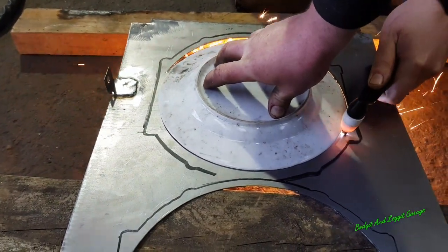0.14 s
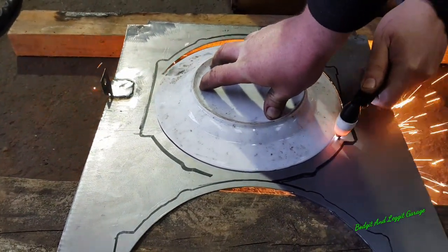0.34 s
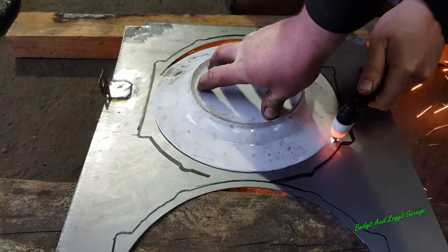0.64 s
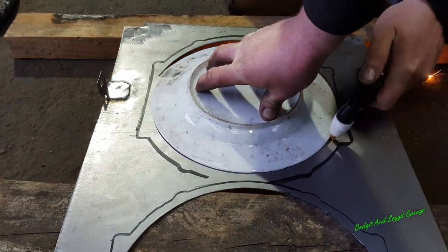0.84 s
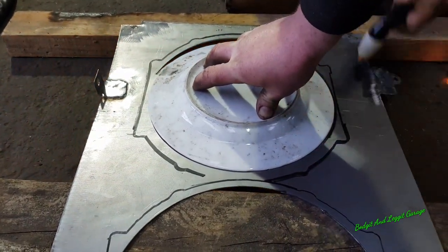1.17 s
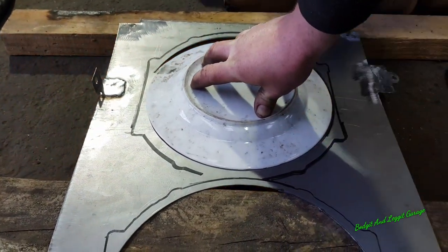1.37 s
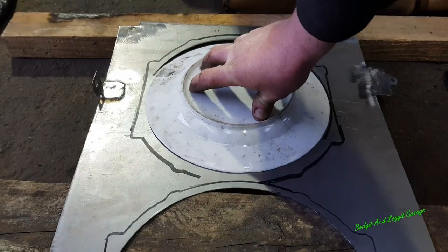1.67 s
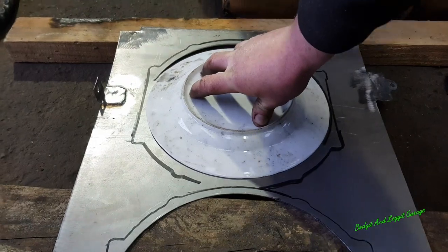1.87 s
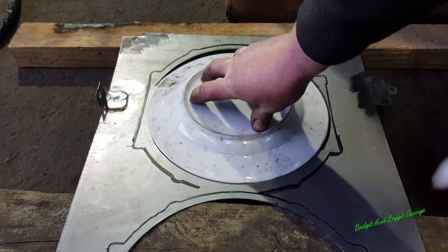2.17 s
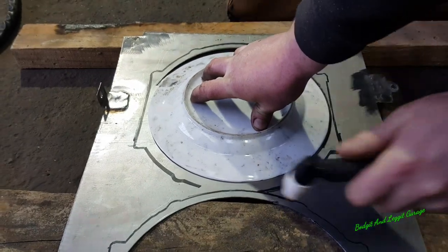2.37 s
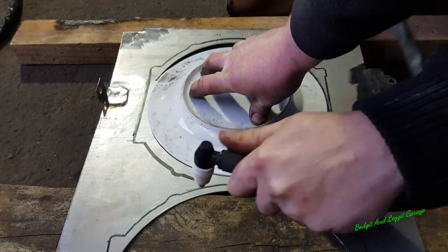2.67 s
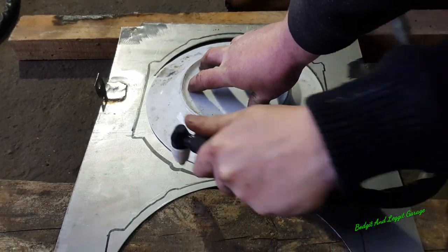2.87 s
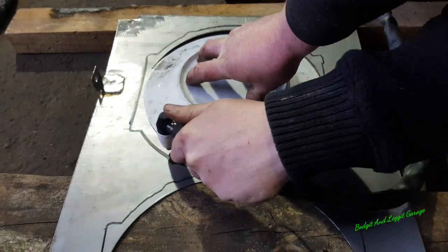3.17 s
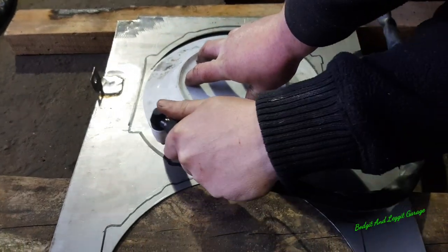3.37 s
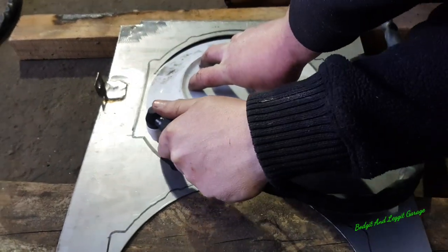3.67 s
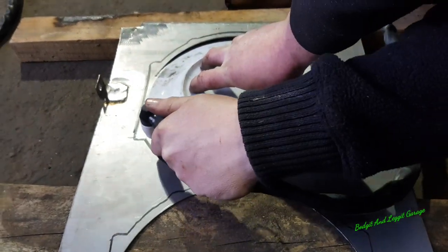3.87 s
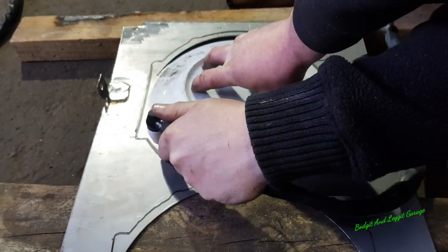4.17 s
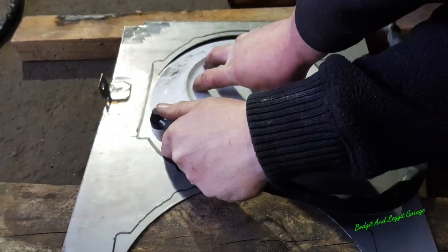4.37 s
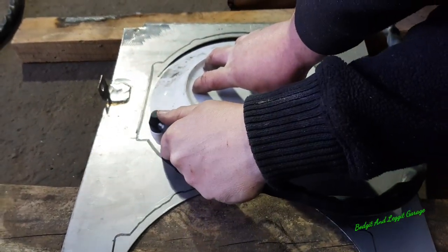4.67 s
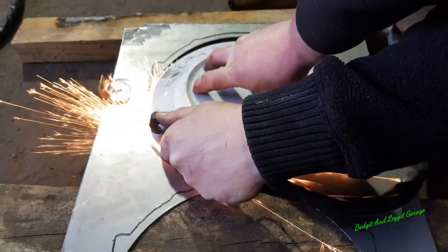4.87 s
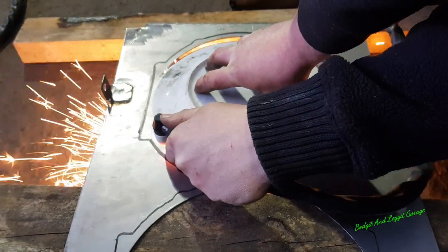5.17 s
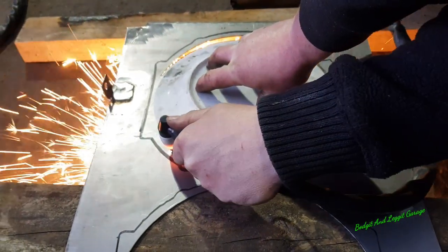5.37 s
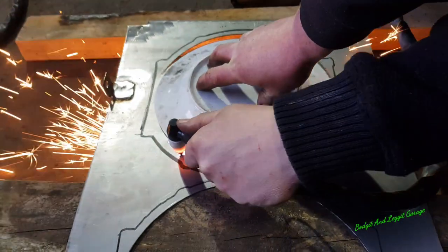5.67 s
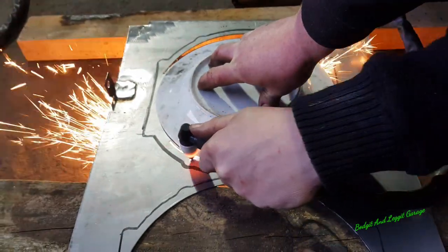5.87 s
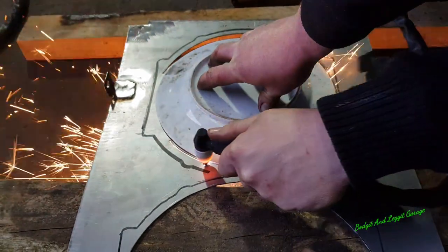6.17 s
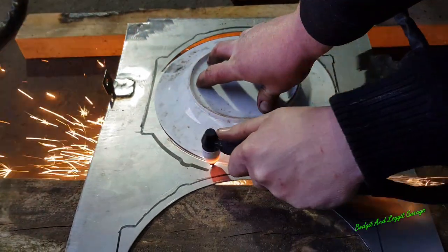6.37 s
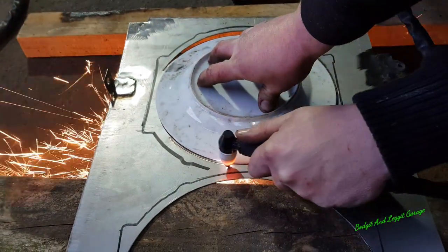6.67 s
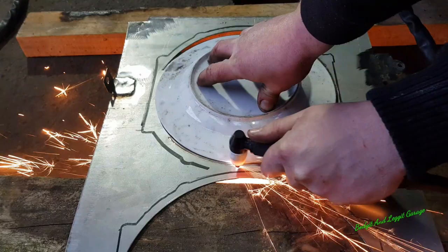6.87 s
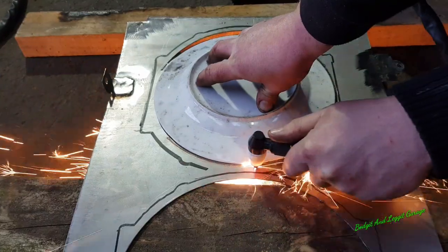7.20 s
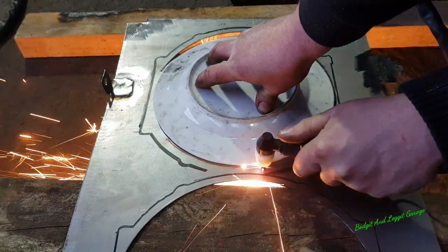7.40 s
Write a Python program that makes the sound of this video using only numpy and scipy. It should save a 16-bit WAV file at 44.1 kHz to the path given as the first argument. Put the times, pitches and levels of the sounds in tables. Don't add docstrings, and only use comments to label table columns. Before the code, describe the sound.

Steady roaring hiss of a metal-cutting jet, a sharp pop, quieter air and dull bumps, a rough whoosh, then a chirping strike; a compressor hums throughout.

```python
import sys
import numpy as np
from scipy import signal
from scipy.fft import rfft, irfft, next_fast_len
from scipy.io import wavfile
from scipy.ndimage import uniform_filter1d, map_coordinates

SR = 44100
rng = np.random.default_rng(int(sys.argv[2]) if len(sys.argv) > 2 else 0)


def elevation(decibels):
    levels = np.asarray(decibels, float)
    return 10 ** (levels / 20)


def persist_wave(psi):
    counts = np.round(np.clip(psi, -1, 1) * 32767).astype(np.int16)
    wavfile.write(sys.argv[1], SR, np.atleast_2d(counts).T)


N = 332514


def unit(x):
    return x / np.sqrt(np.mean(x ** 2, axis=-1, keepdims=True) + 1e-20)


def along(points, hz):
    f, v = np.transpose(points)
    return np.interp(np.log(hz + 1), np.log(f + 1), v)


def curves(rows):
    s, *cols = np.transpose(rows)
    return [np.interp(np.arange(N) / SR, s, c) for c in cols]


def wobble(rate):
    return map_coordinates(rng.standard_normal(int(N * rate / SR) + 4), [np.arange(N) * rate / SR])


def filtered(x, response):
    m = next_fast_len(N + SR // 2)
    return irfft(rfft(x, m) * response(np.fft.rfftfreq(m, 1 / SR)), m)[..., :N]


def above(hz, edge_hz):
    return 1 / (1 + (edge_hz / (hz + 1)) ** 12)


def resonances(peaks):
    def response(f):
        total = 0
        for k, (c, w, db) in enumerate(peaks):
            total = total + (-1) ** k * elevation(db) * 1j * f * w / (c * c - f * f + 1j * f * w)
        return total
    return response


def field(shape, bins, frames):
    x = uniform_filter1d(rng.standard_normal(shape), size=bins, axis=-2)
    x = uniform_filter1d(x, size=frames, axis=-1)
    return x / x.std()


def panned(x, db, pan_db):
    sides = elevation(np.array([pan_db / 2, -pan_db / 2]))
    return 2 * elevation(db) * x * sides / np.sqrt(np.sum(sides ** 2, axis=0))


# f/Hz, correlation/1
PORT_LIKENESS = [(60, 1), (290, 0.84), (640, 0.89), (1400, 0.29), (3100, 0.24), (6800, 0.19),
                 (15000, 0.078)]


def turbulence(gust_db, ripple_db):
    pair = rng.standard_normal((2, N))
    turn = lambda hz: np.arccos(np.clip(along(PORT_LIKENESS, hz), -1, 1)) / 2
    mid, side = filtered(pair, lambda hz: np.array([np.cos(turn(hz)), np.sin(turn(hz))]))
    z = signal.stft(np.array([mid + side, mid - side]), nperseg=512)[2]
    gust = gust_db * field(z.shape[1:], bins=8, frames=10)
    ripple = ripple_db * field(z.shape, bins=3, frames=120)
    return signal.istft(z * elevation(gust + ripple), nperseg=512)[1][:, :N]


# t/s, half length/s, low level/dB, high level/dB
GUSTS = [(1.286, 0.035, 5, -0.4), (1.414, 0.023, 10, -2), (1.526, .03, 3, 0.5), (1.82, 0.053, 5.5, -0.5),
         (1.989, .02, 2, 1.5), (2.248, 0.031, 14.5, 1), (2.633, 0.037, -1.5, 2.5), (5.017, 0.024, -2.5, 4),
         (6.05, .17, -8, 0.6), (6.38, .06, 2, -0.4), (7.057, 0.07, -1, -1), (7.426, 0.071, 2.5, 0.5)]


def gusts():
    t = np.arange(N) / SR
    return sum(np.outer([low_db, high_db], np.exp(-((t - s) / half_s) ** 2))
               for s, half_s, low_db, high_db in GUSTS)


# f/Hz, width/Hz, level/dB
LID_MODES = [(1234, 37, 7.5), (1853, 39, -5.5), (2180, 55, -2), (2440, 42, -5), (2770, 80, -25),
             (3013, 58, -10), (3455, 170, -8.5), (3910, 150, -5.5), (5410, 72, -13)]


def lid_ring():
    blow = rng.standard_normal(N) + 0.7 * rng.standard_normal((2, N))
    return unit(filtered(filtered(blow, resonances(LID_MODES)), lambda hz: above(hz, 1203)))


# t/s, gas flow/dB, splash on steel/dB re flow, aim at right port/dB, air under lid/dB re flow
TORCH = [(0, -26, -7, 4, -3), (.77, -25.5, -8, 2, -6), (.99, -26, -11.5, 1.5, -8.5),
         (1.08, -29.5, -5.5, 3, 2), (1.28, -32.5, -1.5, 7, 6), (1.45, -39, 0.5, 5.5, -6),
         (1.9, -39, -6, 4.5, -11.5), (2.16, -37.5, -6.5, 9, -15), (2.36, -29, -13, 0.5, -20),
         (2.56, -30.5, 8, 2, -8.5), (2.85, -31.5, -5.5, -0.5, -20), (3.25, -29, -9, -2, -2),
         (4.68, -27, -8, -2, -0.5), (4.95, -25, -8, -0.2, -2), (5.2, -28, -5, -.8, -7.5),
         (6.45, -28.5, -2.5, 0.1, -9), (7.15, -28, -2.5, 1.5, 1), (7.54, -26, 2, 2, 0)]
# f/Hz, density/dB per Hz
LEFT_COLOUR = [(200, 9.5), (600, 10.5), (1000, 9), (1300, 16), (2200, 19.5), (3700, 14), (5000, 12),
               (6300, 3), (7500, -9.5), (8600, -0.5), (9800, -0.5), (11500, -5), (13500, -6.5),
               (15300, -17)]
RIGHT_COLOUR = [(200, 14.4), (600, 9.9), (1000, 8.3), (1300, 11.5), (1800, 17.6), (3200, 7.3), (4600, 10.3),
                (6000, 12.4), (7300, 11.8), (8000, 6), (9300, 5), (10500, 12.5), (13000, 16.6),
                (15400, 12.6)]
RANGE_EDGES_HZ = [300, 1100, 3000, 7700, 17000]


def jet():
    flow_db, splash_db, aim_db, lid_db = curves(TORCH)
    low_db, high_db = gusts()
    splash_db, flow_db = splash_db + low_db, flow_db + high_db
    body_pan_db = 7.5 + 0.15 * splash_db
    noise = turbulence(gust_db=0.77, ripple_db=2.0)

    def band(k):
        low_hz, high_hz = RANGE_EDGES_HZ[k], RANGE_EDGES_HZ[k + 1]

        def response(hz):
            ports = elevation(np.array([along(LEFT_COLOUR, hz), along(RIGHT_COLOUR, hz)]))
            return ports * np.sqrt(above(hz, low_hz) * (1 - above(hz, high_hz)))
        return unit(filtered(noise, response))

    flutter_db = 0.38 * wobble(9)
    roar = band(0)
    dull = filtered(roar, lambda hz: 1 - above(hz, 770))
    tilt = elevation(0.8 + 0.2 * splash_db)
    roar = (dull / tilt + (roar - dull) * tilt) * elevation(np.array([[.3], [-.3]]))
    out = elevation(flow_db + splash_db + 0.58 + 0.29 * wobble(17)) * roar
    out += panned(band(1), flow_db - 4 + 0.44 * splash_db + flutter_db, body_pan_db)
    out += panned(band(2), flow_db + flutter_db, -1.35 - 0.67 * aim_db)
    out += panned(band(3), flow_db + aim_db + 0.29 * wobble(9), -8 - 1.1 * aim_db)
    ring_db = flow_db + lid_db + 0.27 * low_db - 1.0 + 1.45 * wobble(12)
    return out + panned(lid_ring(), ring_db, body_pan_db)


# t/s, level/dB, centre f/Hz
SWEEP = [
    (2.42, -60, 700),
    (2.48, -37.5, 800),
    (2.54, -28.5, 905),
    (2.6, -23.5, 1450),
    (2.65, -31, 2310),
    (2.7, -38, 3000),
    (2.76, -56, 3200),
]
# f/Hz, width/Hz, level/dB
RIM_MODES = [(450, 140, -4), (800, 72, 4), (1330, 220, -1.5), (1980, 720, -3.5), (3000, 1200, -5)]


def sweep():
    level_db, centre_hz = curves(SWEEP)
    noise = rng.standard_normal(N) + 0.86 * rng.standard_normal((2, N))
    hz, t, z = signal.stft(noise, SR, nperseg=512)
    centre = centre_hz[np.minimum((t * SR).astype(int), N - 1)]
    hump = np.exp(-(np.log((hz[:, None] + 1) / centre) / 0.42) ** 2)
    rough = elevation(4.0 * field(z.shape[1:], bins=2, frames=8))
    rush = signal.istft(z * hump * rough / np.sqrt(centre / 1000), SR, nperseg=512)[1][:, :N]
    return elevation(level_db + 24.0) * filtered(rush, resonances(RIM_MODES)) * elevation(np.array([[3.1], [-3.1]]))


# t/s, left port later by/ms
LEFT_LAG = [(0, 0.24), (.9, 0.23), (1.3, 0.16), (1.7, 0.054), (2.2, .2), (2.7, 0.061), (3.2, -0.012),
            (5.2, -0.049), (5.8, 0.025), (6.7, 0.072), (7.54, 0.12)]


def lagged(x):
    hz, t, z = signal.stft(x[0], SR, nperseg=512)
    lag_s = np.interp(t, *np.transpose(LEFT_LAG)) / 1000
    left = signal.istft(z * np.exp(-2j * np.pi * hz[:, None] * lag_s), SR, nperseg=512)[1][:N]
    return np.array([left, x[1]])


STRIKE_S = 4.991
# t/s, length/s, level/dB
BURSTS = [
    (4.9906, .014, -9),
    (5.007, .006, -11),
    (5.017, 0.011, -10),
    (5.028, .008, -20),
    (5.045, .01, -26),
    (5.056, 0.0049, -19.5),
    (5.072, 0.019, -28),
    (5.105, .016, -31),
]


def squeal():
    t = np.arange(N) / SR
    sag_s, edge_s = .04, .0015
    age_s = np.clip(t - STRIKE_S, 0, sag_s)
    pitch_hz = np.where(age_s < sag_s, 2181 - 7500 * age_s, 2064)
    phase = 2 * np.pi * np.cumsum(pitch_hz * (1 + .025 * wobble(400))) / SR
    octave = elevation(-16 + 300 * age_s) * np.sin(2 * phase + 1.5 * wobble(500))
    tone = np.sin(phase) + octave
    level = 0
    for s, length_s, db in BURSTS:
        inside_s = np.minimum(t - s, (s + length_s - t) / 2 + edge_s)
        level = level + elevation(db) * np.clip(inside_s / edge_s, 0, 1)
    return level * tone * elevation(np.array([[3.2], [-4.5]]))


# t/s, peak level/dB, f/Hz, width/Hz
ARC_OUT = [
    (.7872, -4.5, 410, 420),
]


def arc_pop():
    s, db, hz, width_hz = ARC_OUT[0]
    kick = np.zeros(N)
    kick[round(s * SR) + np.array([0, 30])] = -.6, 1
    pop = filtered(kick, resonances([(hz, width_hz, 0), (1500, 1400, -9)]))
    return elevation(db) * pop / np.abs(pop).max()


# t/s, level/dB, time to fall by 20 dB/s
BUMPS = [
    (1.299, -28, 0.02),
    (1.399, -20, 0.02),
    (1.81, -18, 0.02),
    (2, -17, 0.015),
    (2.2, -29, 0.02),
]


def knocks():
    t = np.arange(N) / SR
    thud = unit(filtered(rng.standard_normal(N), resonances([(300, 310, 0)])))
    return thud * sum((t > s) * elevation(db - 9.0 - 60 * np.abs(t - s) / (t20_s * 3)) for s, db, t20_s in BUMPS)


def gain_db():
    t = np.arange(N) / SR
    climb_db = -36.5 + 1.2 * np.clip(t - 1.64, 0, None)
    after_db = -37.5 + 0.84 * (t - STRIKE_S)
    knock_s = 0.12
    return after_db + (climb_db - after_db) * np.exp(-np.clip(t - STRIKE_S, 0, None) / knock_s)


# f/Hz, level/dB
HUM_LINES = [(70, -22.5), (97.5, -20.5), (123.8, 0.5), (145.4, -7.5), (170, -17), (193.8, -14), (267, -19),
             (291, -11.5), (301, -16), (366, -19.5), (409, -15.5)]
# f/Hz, density/dB per Hz
RUMBLE = [(15, -54), (25, -27), (92, -8), (117, 8), (135, 8.5), (167, -9.5), (281, -15.5), (420, -30),
          (550, -32), (920, -120)]
# rate/Hz, depth/dB, crest t/s
BEATS = [
    (2.83, 1.5, 4.93),
    (5.3, 1, 4.94),
]


def compressor():
    t = np.arange(N) / SR
    lines = 0
    for k, (hz, db) in enumerate(HUM_LINES):
        level = elevation(db + 1.5 * wobble(7))
        lines = lines + level * np.sin(2 * np.pi * hz * t + .5 * wobble(5) + k)
    noise = rng.standard_normal(N) + 0.5 * rng.standard_normal((2, N))
    notch_db = lambda hz: 13.3 * np.exp(-((hz - 128) / 30) ** 2)
    rumble = unit(filtered(noise, lambda hz: elevation(along(RUMBLE, hz) - notch_db(hz))))
    beat_db = sum(db * np.cos(2 * np.pi * rate_hz * (t - s)) for rate_hz, db, s in BEATS)
    mix = elevation(2.0 + beat_db) * lines + elevation(-6.5) * rumble
    return elevation(gain_db()) * mix * elevation(np.array([[-.9], [.9]]))


# t/s, level/dB
DUCK = [
    (4.989, 0),
    (4.994, -5.5),
    (5.02, -3),
    (5.045, 0),
    (5.12, -0.5),
]


def scene():
    steady = lagged(jet() + sweep()) + compressor()
    return elevation(curves(DUCK)[0]) * steady + squeal() + arc_pop() + knocks()


def top_cut(x):
    return signal.sosfilt(signal.butter(12, 16800, fs=SR, output="sos"), x)


def record(dry):
    mix = dry / (1 + np.abs(dry / 0.97) ** 6) ** (1 / 6)
    return top_cut(mix)


dry = scene()
out = record(dry)
persist_wave(out)
```